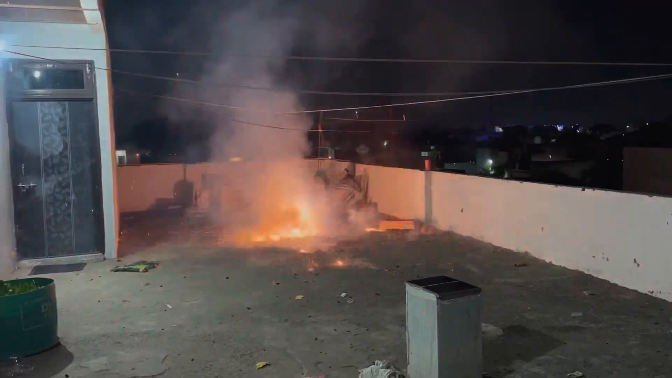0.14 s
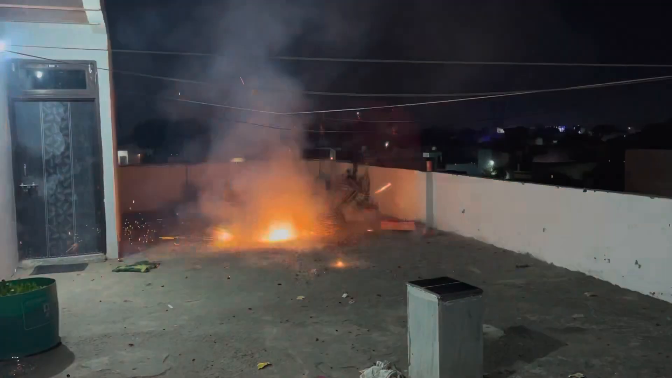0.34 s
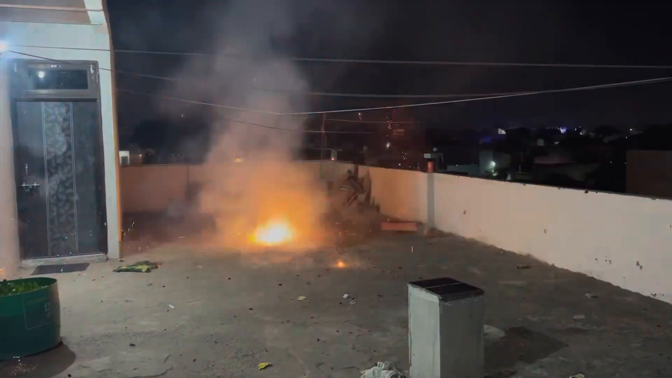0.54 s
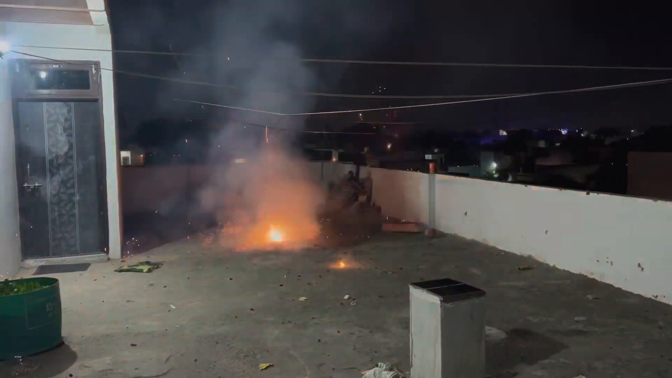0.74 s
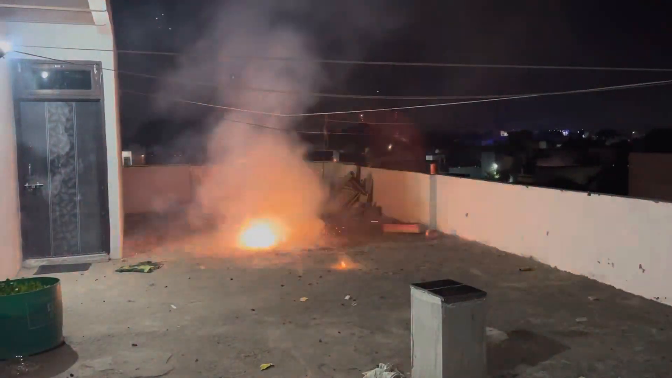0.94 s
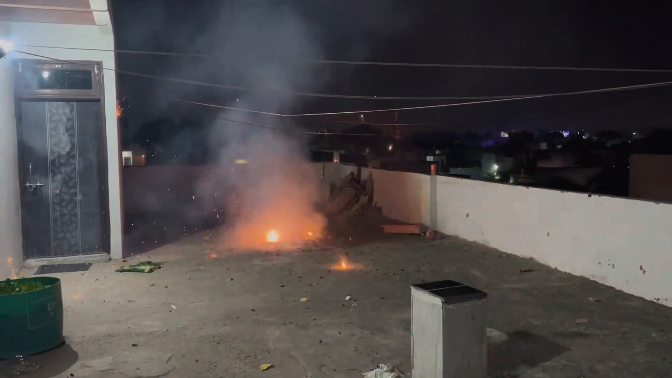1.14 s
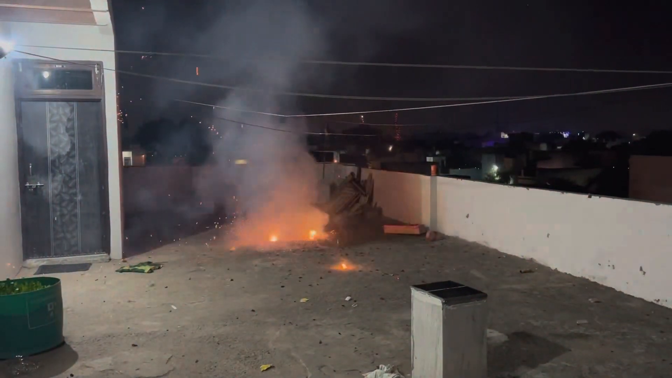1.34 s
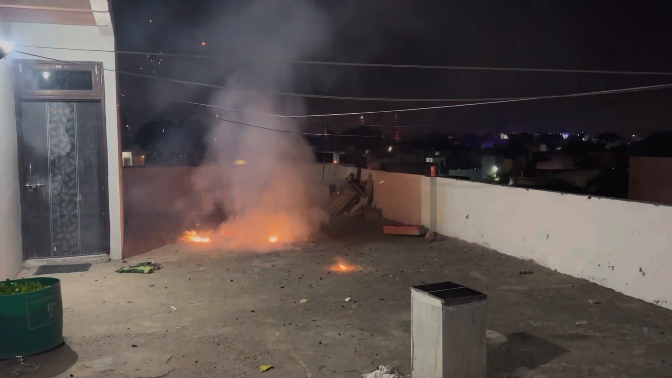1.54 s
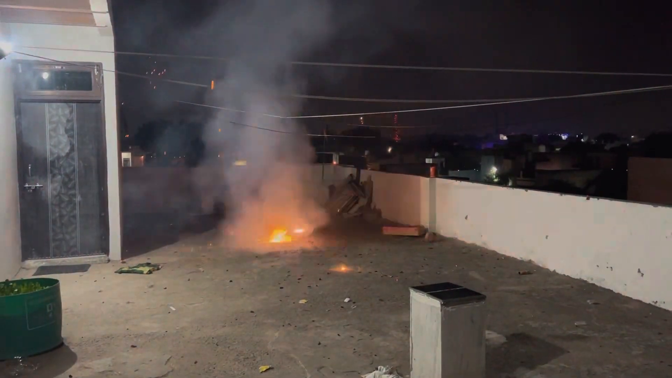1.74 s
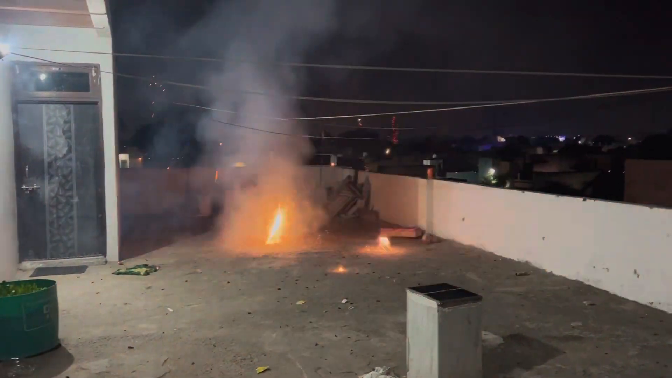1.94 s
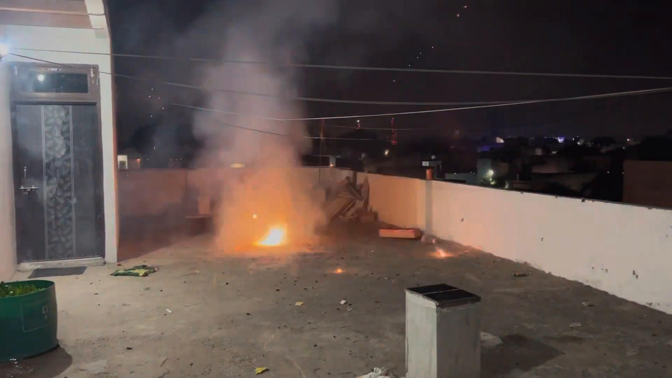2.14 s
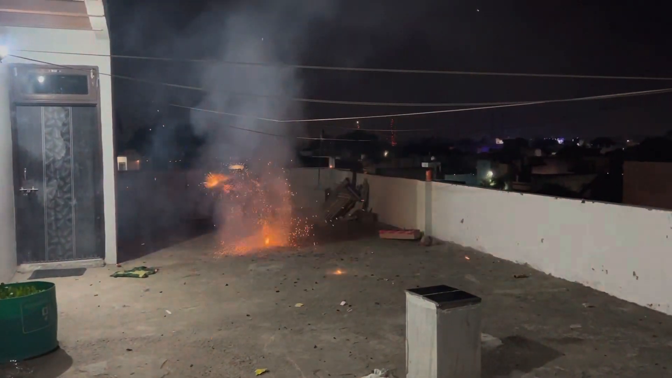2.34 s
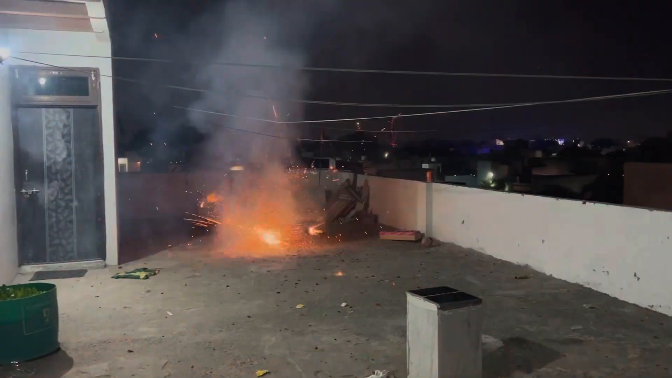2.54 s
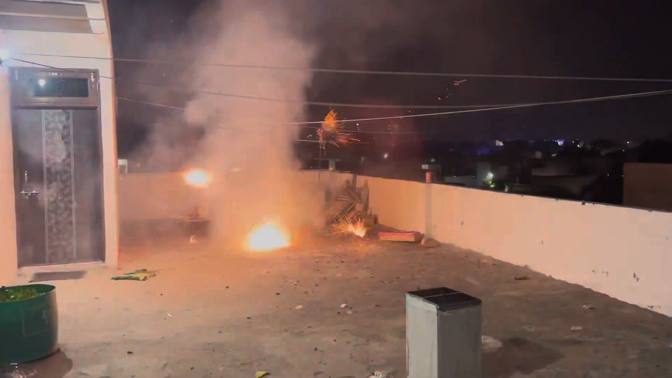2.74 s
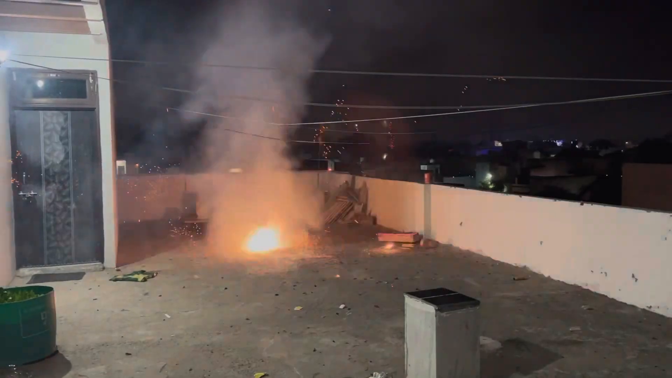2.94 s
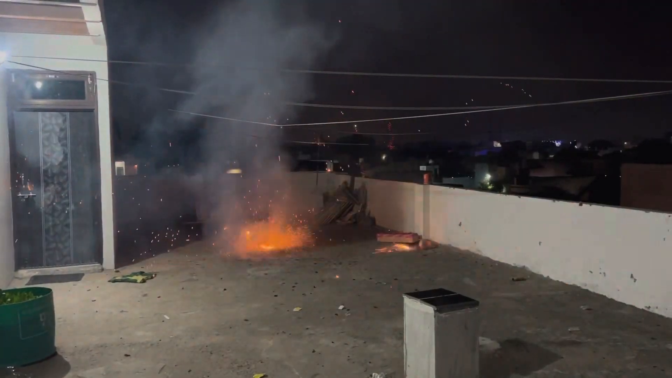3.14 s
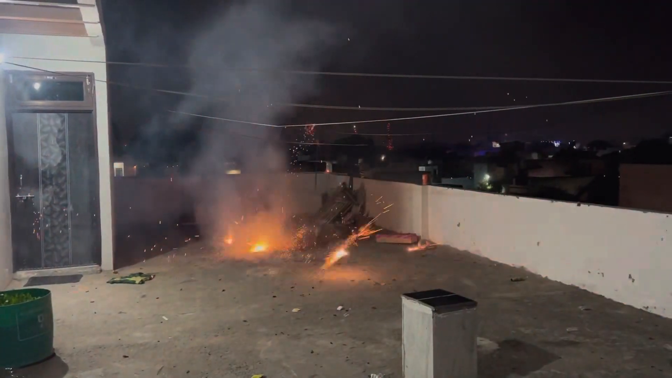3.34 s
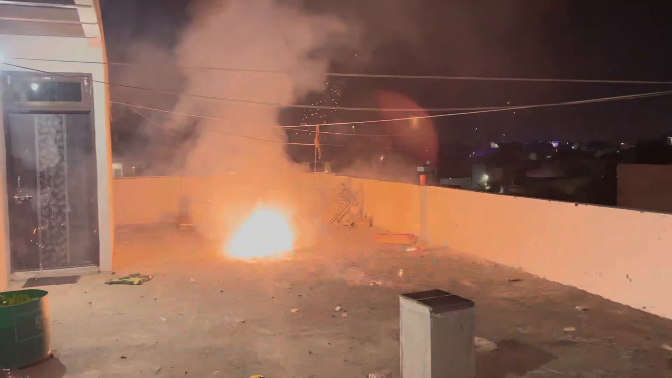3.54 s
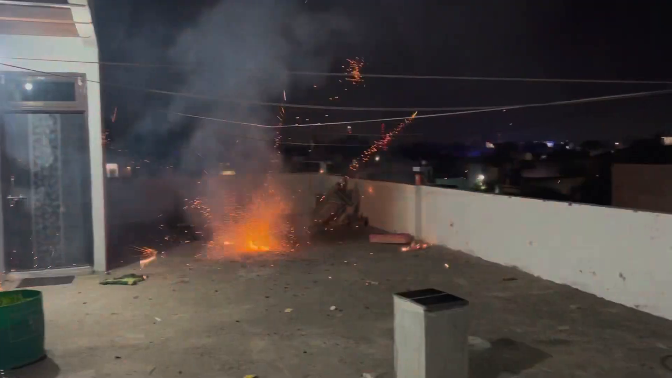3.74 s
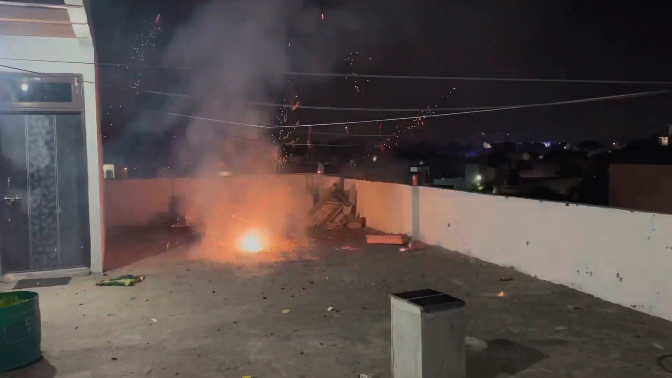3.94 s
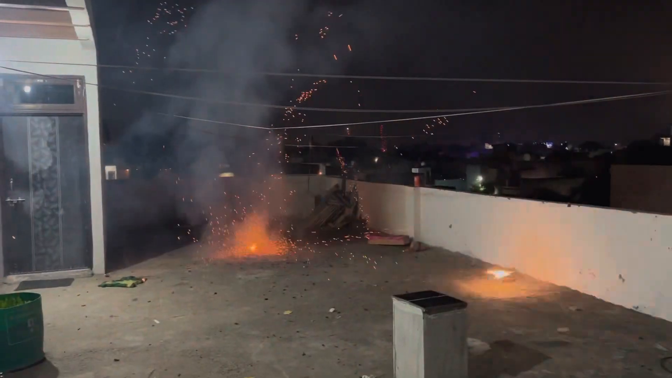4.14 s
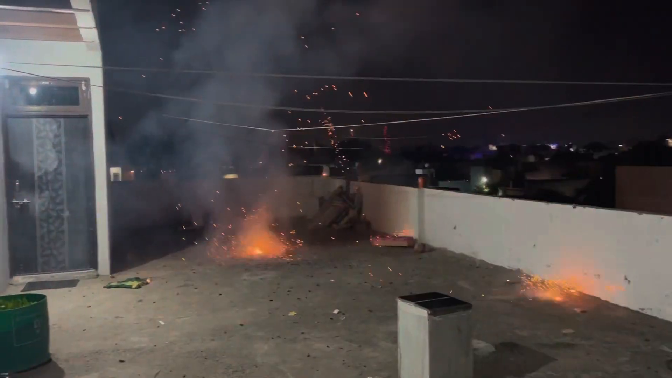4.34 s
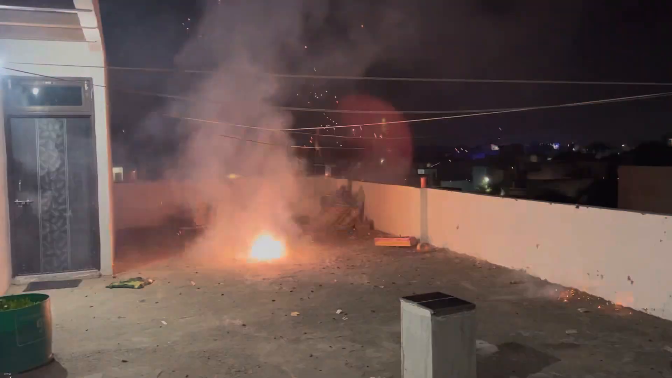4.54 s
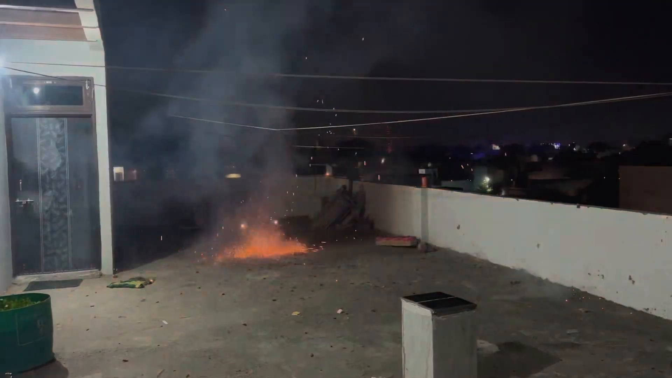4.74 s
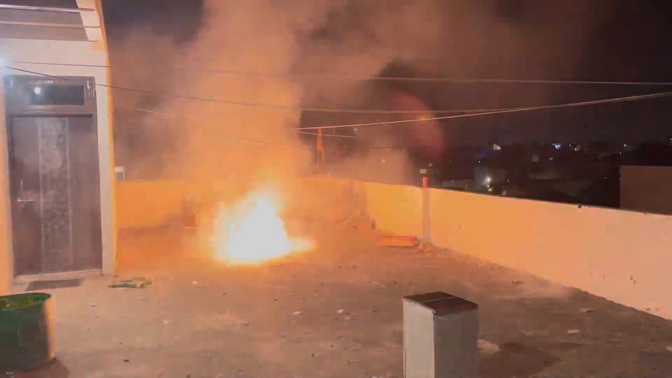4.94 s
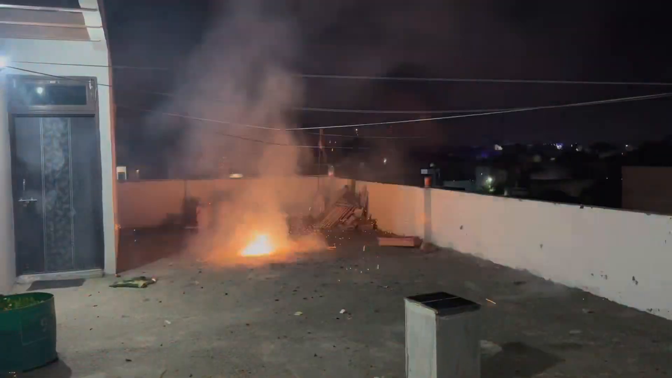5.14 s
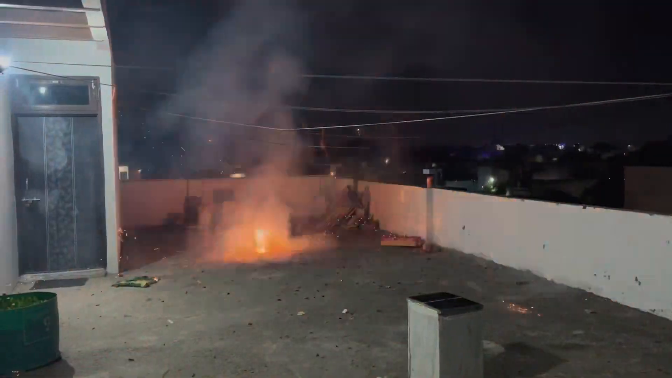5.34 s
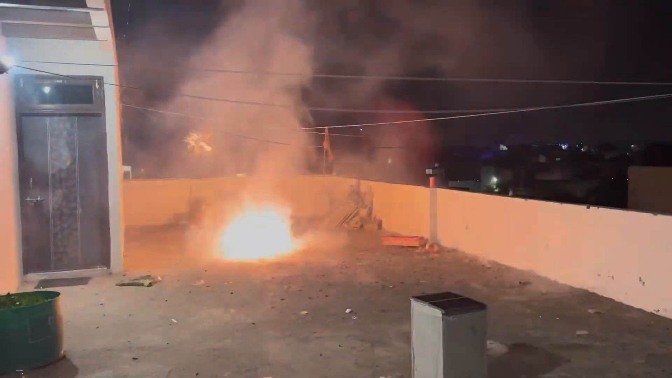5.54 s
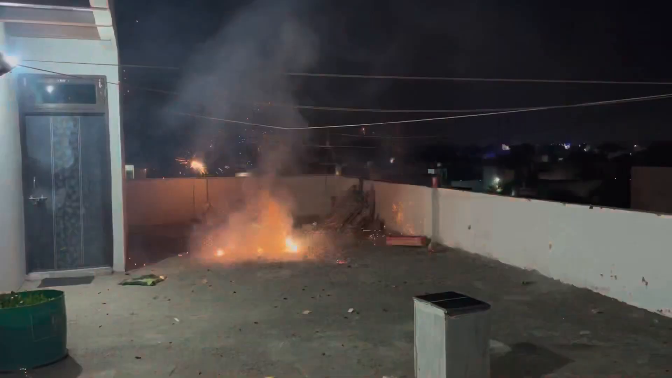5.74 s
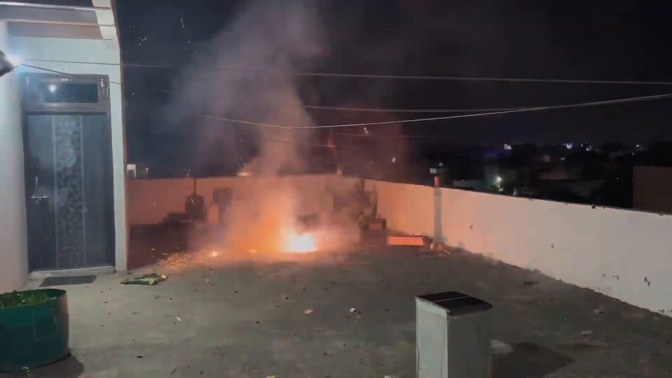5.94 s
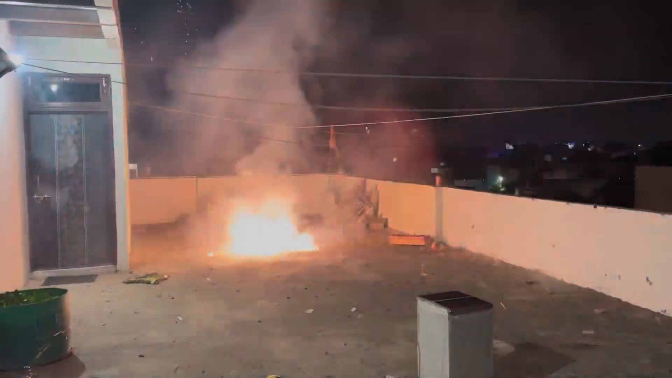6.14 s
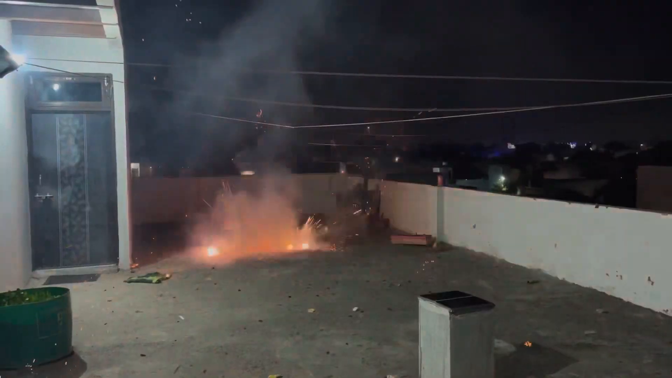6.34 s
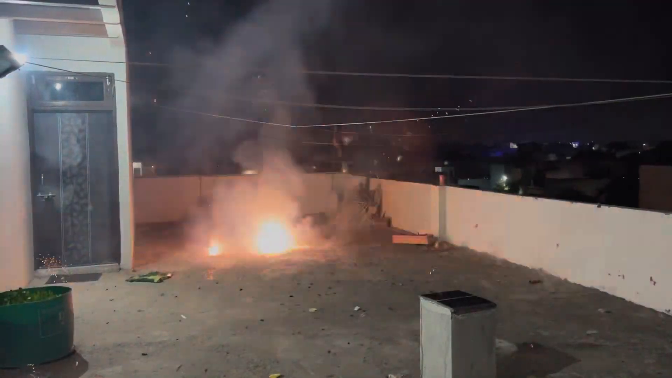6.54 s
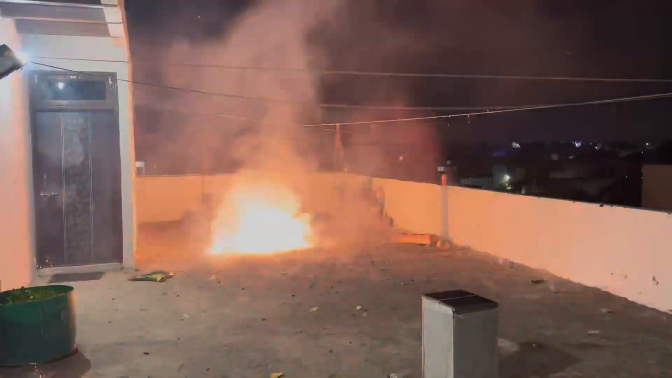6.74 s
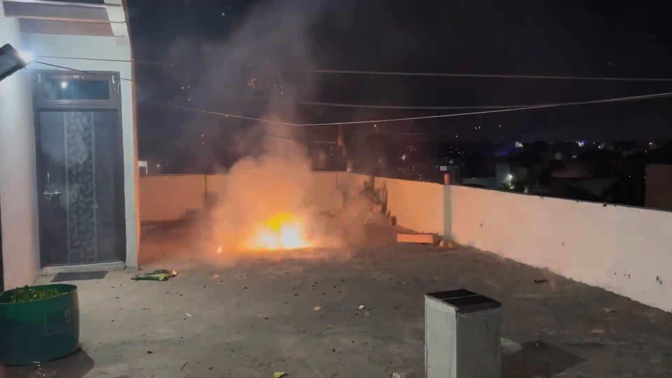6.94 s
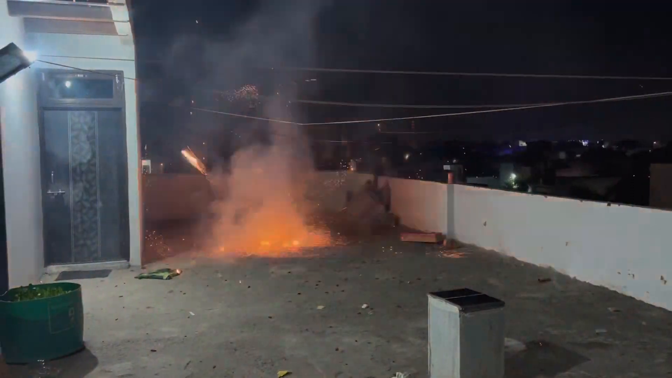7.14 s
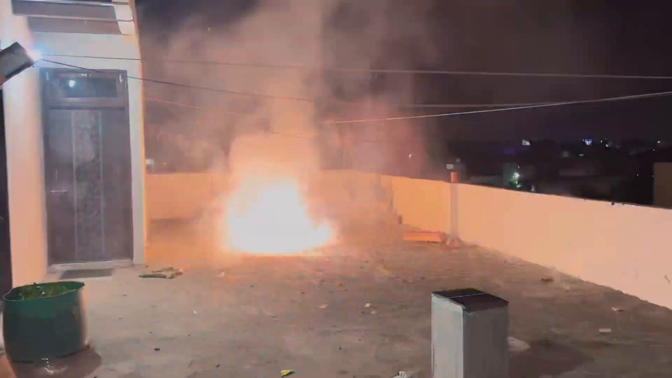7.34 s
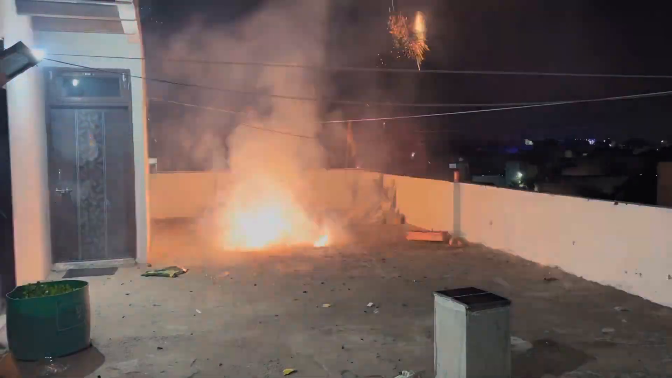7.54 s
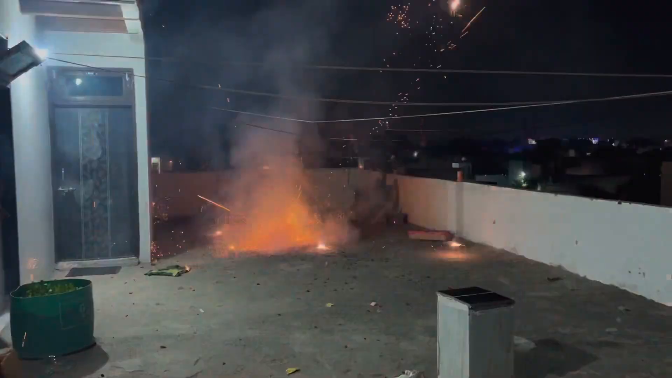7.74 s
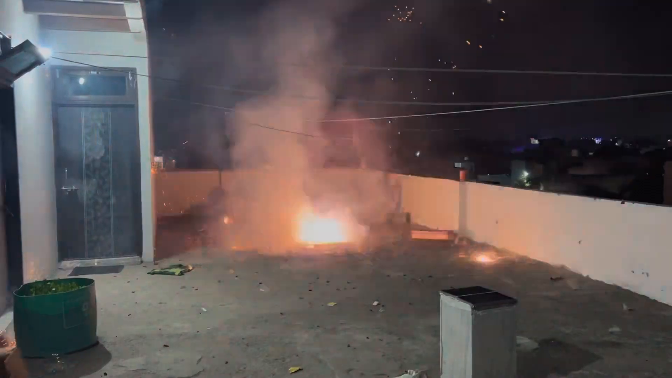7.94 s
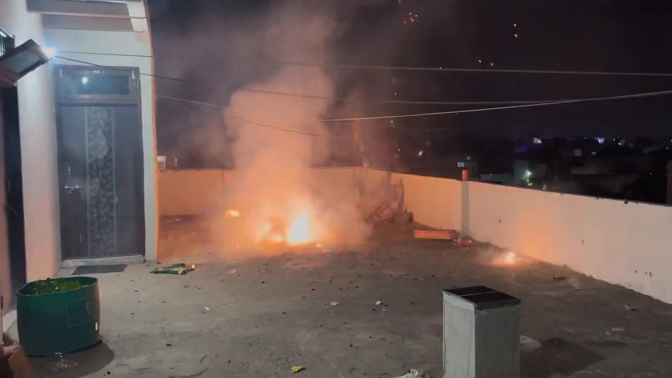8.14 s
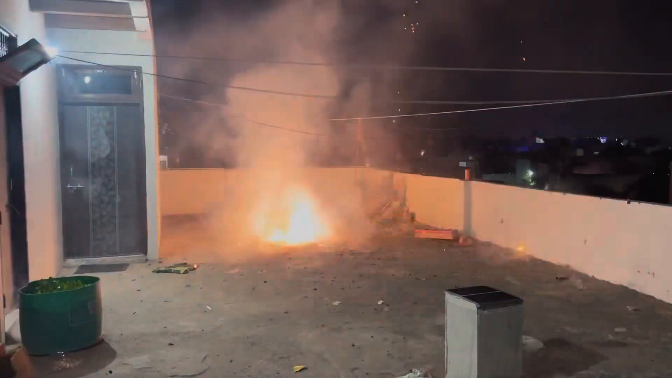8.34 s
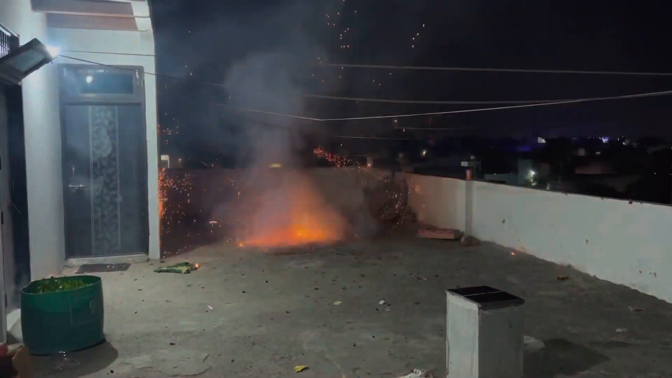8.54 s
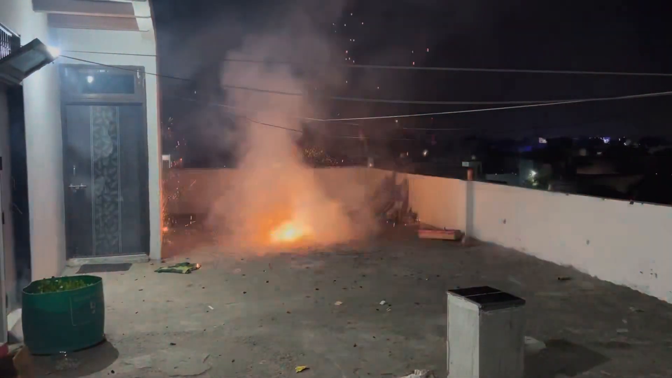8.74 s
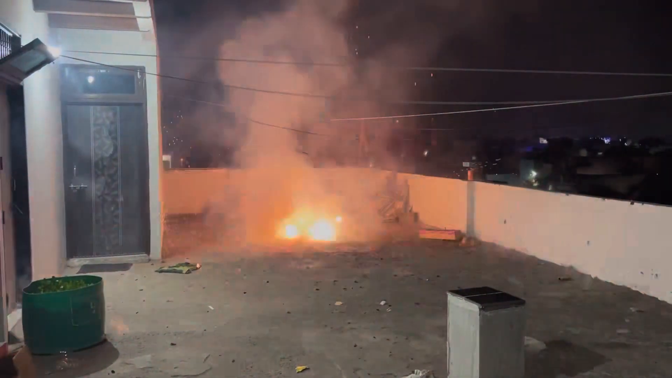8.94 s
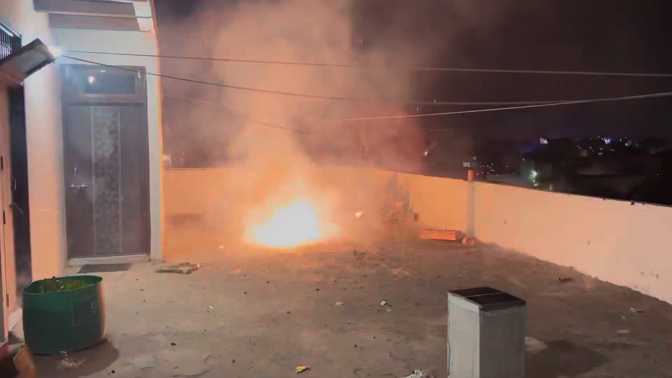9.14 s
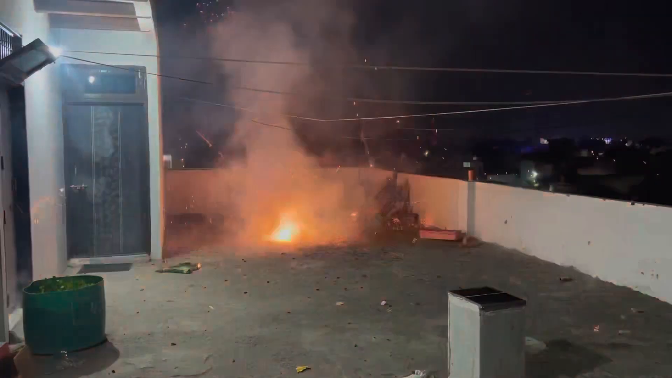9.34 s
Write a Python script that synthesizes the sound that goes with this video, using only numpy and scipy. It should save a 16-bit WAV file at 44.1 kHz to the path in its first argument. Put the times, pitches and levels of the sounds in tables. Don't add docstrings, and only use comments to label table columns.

```python
import sys
import numpy as np
from scipy import signal
from scipy.fft import rfft, irfft, next_fast_len
from scipy.io import wavfile
from scipy.ndimage import uniform_filter1d

SR = 44100
rng = np.random.default_rng(int(sys.argv[2]) if len(sys.argv) > 2 else 0)


def generate_wav(sig):
    pcm = np.round(np.clip(np.atleast_2d(sig).T, -1, 1) * 32767).astype(np.int16)
    wavfile.write(sys.argv[1], SR, pcm)


def voltage_ratio(level):
    return 10 ** (np.asarray(level, float) / 20)


N = 418068

# (frequency [Hz], level [dB per Hz])
NIGHT_SPECTRUM = [(15, -45), (40, -18), (100, 10.5), (311, 9.5), (919, -3), (4000, -11.5), (8000, -13.5),
                  (14000, -20.5), (16300, -50)]
# (time [s], frequency [Hz], level [dB])
WHISTLES = [
    [(0, 3100, -56), (.1, 3150, -58), (.19, 3130, -53), (.3, 3050, -55), (.42, 2980, -54), (.5, 2960, -58),
     (.6, 2930, -58), (.68, 2900, -62)],
    [(5.38, 1320, -50), (5.42, 1345, -31), (5.5, 1385, -30), (5.54, 1400, -48)],
    [(5.6, 1560, -55), (5.62, 1440, -35), (5.645, 1370, -37), (5.67, 1320, -56)],
    [(8.26, 960, -64), (8.29, 1090, -52), (8.33, 1220, -39), (8.39, 1250, -31), (8.42, 1240, -48)],
]
# (frequency [Hz], level [dB per Hz])
POWDER_SPECTRUM = [(15, -49), (30, -28), (50, -2), (110, -2.5), (190, -3.5), (260, -7.5), (500, -10.5),
                   (750, -14.5), (1400, -12), (2500, -15), (5000, -20.5), (8000, -24), (13000, -24.5),
                   (15500, -32.5), (16300, -46)]
# (delay [s], level [dB], sideways spread [samples])
WALL_COPIES = [(0, 7.5, -5.5), (.0022, 1.5, -7), (.0061, 1.5, -10.5), (.0107, -3, 0), (0.0138, -21.5, 4),
               (0.017, -20, 6), (.022, -9.5, 4), (.029, -11.5, 2)]
# (frequency [Hz], time to fall 60 dB [s])
YARD_DECAY = [(40, 0.11), (110, 0.015), (300, 0.37), (750, 0.37), (2000, 0.23), (5000, 0.26), (13500, 0.2)]
# (frequency [Hz], time to fall 60 dB [s])
TOWN_DECAY = [(50, 3.1), (500, 0.73), (4000, 1.27), (14000, 0.29)]
# (frequency [Hz], width [Hz], level [dB])
PARAPET_RINGS = [(182, 70, 2.5), (386, 26, 5)]
# (frequency [Hz], left-right likeness [0 to 1])
PORT_LIKENESS = [(60, 0.95), (300, 0.97), (700, 0.52), (1100, 0.13), (2100, 0.76), (2800, 0.38),
                 (4500, 0.97), (5300, 0.18), (6500, 0.7), (8000, 0.4)]
# (frequency [Hz], left leads by [rad])
PORT_LEAD = [(0, 0), (700, .5), (1050, 1.1), (1300, 2.6), (1650, 3.9), (1850, 6.4), (2400, 7.1),
             (4800, 7.1), (6300, 12.4), (7100, 12.5), (16000, 3.1)]
# (frequency [Hz], left over right [dB])
PORT_TILT = [(60, 0.0), (110, 0.0), (200, 0.0), (380, 1.0), (700, 2.0), (1290, -0.5), (2380, 1.0),
             (4400, 0.5), (8120, 0.0), (15000, 0.0)]

# (time [s], peak level [dB], boom [dB], sharpness [dB])
OPEN_EARLY = [(-.12, -4, -11, -14), (.087, -20, -36, -9), (.1957, -1.5, -12.5, -12.5),
              (.316, -1, -19, -17.5), (.57, -19, -20, -25), (.6113, -3.5, -28, -9), (.895, -14.5, -34, -19),
              (.941, 0, -12.5, -16.5), (1.9526, -9.5, -21, -25.5), (2.072, 0.5, -30, -19.5),
              (2.389, 2, -16, -16.5), (2.536, -13, -24, -21.5), (2.703, -14.5, -33, -13.5),
              (2.742, -4.5, -12, -5.5), (2.756, 3, -32, -20), (3.0996, -2, -15.5, -15.5),
              (3.239, 0.5, -14.5, -14), (3.38, -9, -18, -17.5), (3.661, -5.5, -15.5, -8.5),
              (3.9065, 2.5, -21, -18), (4.0283, 1, -18, -17), (4.053, -1, -8.5, -12.5),
              (4.273, -27, -26, -11), (4.4405, 0.5, -14.5, -14), (4.495, -0.5, -26, -20)]
# (time [s], peak level [dB], boom [dB], sharpness [dB])
OPEN_MIDDLE = [(4.8447, -1, -57, -11.5), (5.049, -4, -39, -14.5), (5.197, -6, -28, -20),
               (5.248, -1.5, -13.5, -19), (5.301, -1, -14, -12.5), (5.442, -8.5, -20, -6.5),
               (5.4847, -1, -11, -10.5), (5.7204, -6.5, -21, -11.5), (5.794, -12.5, -25, -8),
               (5.835, -2.5, -9.5, -15.5), (5.893, -1, -15, -15), (6.0655, 0.5, -16, -13.5),
               (6.156, -15.5, -22, -22), (6.1986, -1, -15, -26), (6.3098, -2, -20, -21.5),
               (6.405, -0.5, -19.5, -16), (6.429, -9.5, -28, -14), (6.536, -6.5, -23, -12.5),
               (6.614, -17, -12, -25), (6.67, -1.5, -31, -16), (6.715, -24, -8, 2.5)]
# (time [s], peak level [dB], boom [dB], sharpness [dB])
OPEN_LATE = [(7.188, -2, -7, -13), (7.229, -4.5, -41, -12), (7.353, -17, -23, -13.5),
             (7.423, -3.5, -24, -28.5), (7.733, -2, -16, -14.5), (7.8336, -1.5, -15.5, -13.5),
             (8.396, -9.5, -7, -9), (8.436, -1, -7, -15.5), (8.591, -14, -7, -20),
             (8.6115, -1.5, -12, -13.5), (8.658, -2, -21, -15.5), (8.7035, -2.5, -13, -10.5),
             (8.815, -3, -27, -32.5), (8.9, -17, -31, -22.5), (9.015, 0.5, -24, -15),
             (9.16, 1.5, -10.5, -17.5), (9.254, -1, -12, -18), (9.295, -1, -29, -13)]
# (time [s], peak level [dB], boom [dB], sharpness [dB])
FLUNG = [(.345, -6, -14, -14), (.676, -8.5, -18, -15), (.708, -6.5, -41, -17.5), (.91, -6, -28, -20),
         (1.189, -46, 9, -21), (1.2115, -8, -18, -23.5), (1.731, -10.5, -22, -13), (1.856, -7, -20, -16),
         (2.1875, -6.5, -23, -16.5), (2.65, -32, -22, -23), (2.852, -6, -24, -19),
         (2.9735, -7.5, -16.5, -8), (3.5666, -1, -13.5, -11), (4.227, -9.5, -16, -7),
         (4.597, -4.5, -14, -10.5), (4.626, -7.5, -36, -17.5), (4.976, -12, -7, -8.5),
         (5.025, 1.5, -13, -15.5), (5.159, -0.5, -28, -18.5), (5.532, -5, -18, -12),
         (5.945, -2.5, -13, -12), (6.648, -37, -3, -15), (7.017, 3.5, -38, -24.5), (7.949, -9.5, -26, -9.5),
         (8.304, -10, -16, -21), (8.777, -10, -23, -4), (8.9455, -2.5, -31, -14.5), (9.202, -3.5, -20, -26),
         (9.323, -12, -25, -8.5), (9.405, -6.5, -15, -10.5)]
# (time [s], peak level [dB], boom [dB], sharpness [dB])
HIDDEN = [(.818, -22, -19, -10), (1.358, -37.5, 2, -26), (1.781, -18.5, -14, -17), (2.215, -5.5, -11, -19),
          (3.781, -7, -21, -9.5), (4.837, -8.5, -7, -33), (5.412, -16, -28, -22), (5.466, -17.5, 0, -8.5),
          (6.901, -8.5, -3, -11.5), (6.913, -6, -15.5, -14.5), (7.0, -7, -11, -24), (7.047, -16, -35, -7.5),
          (7.082, -4.5, -17, -18.5), (7.393, -10, -24, -19), (7.563, -15, -14, -18.5),
          (7.588, -8, -18.5, -21), (8.006, -7.5, -10, -34), (8.035, -5.5, -31, -16), (8.358, -12, -11, -25),
          (8.511, -8.5, -27, -16), (9.279, -19, -22, -7)]
# (time [s], peak level [dB], boom [dB], sharpness [dB])
UNSEEN = [
    (1.4, -53, -20, -12),
    (1.42, -50, -12, 5),
    (2.416, -17, -33, -22.5),
    (7.695, -19, -2, -25.5),
]
# (time [s], peak level [dB], boom [dB], sharpness [dB], yard
# feed [dB])
BURIED = [(.227, -11, -25, -11, -14), (.243, -16, -15, -3, -3), (1.41, -44.5, -19, -8, 21.5),
          (1.433, -40.5, -20, -11, 13), (1.448, -41, -10, -17, 13), (1.56, -58, -18, -0.5, 17.5),
          (1.53, -54, 10, -20, 0), (.849, -26, -25, -6, -13), (2.222, -14, -21, -1, -14),
          (3.76, -24, -22, -6, -8), (5.747, -14, -27, -12, -6), (6.005, -25, -25, -10, -8),
          (7.053, -15.5, -25, -13, 0), (7.405, -19, -23, -12, 0), (7.648, -26, -27, -16, -5),
          (8.365, -12, -23, -11.5, -2), (9.423, -20, -25, -12, -5), (1.792, -14, -16, -16, -8),
          (2.314, -33, -25, -6, -6), (2.488, -25.5, -25, -9, 3), (3.599, -12.5, -29, -15.5, 10.5),
          (3.798, -2.5, -22, -18, -8), (3.819, -7, -30, -18, -20), (4.217, -19, -28, -2.5, -5),
          (4.518, -14.5, -31, -20, 4.5), (5.083, -20, -25, -8, -1), (5.359, -26, -25, -14, -8),
          (5.862, -7.5, -26, -9, -13), (6.952, -8, -11, -12.5, 4.5), (6.979, -10.5, -8, -10.5, 7.5),
          (7.199, -3.5, -25, -11.5, 4), (7.855, -10, -25, -12, 0), (8.129, -12, -10, -19, 1),
          (8.462, -8, -25, -13, -2), (8.635, -7, -25, -14, -8), (9.064, -12, -25, -19, 4),
          (9.174, -6, -12, -7.5, -1.5)]
OPEN_YARD_DB, FLUNG_YARD_DB, HIDDEN_YARD_DB, UNSEEN_YARD_DB = 1.1, -2, 7.5, 17.5


def along(points, hz):
    f, value = np.transpose(points)
    return np.interp(np.log(hz + 1), np.log(f + 1), value)


def filtered(x, response):
    m = next_fast_len(N + SR)
    return irfft(rfft(x, m) * response(np.fft.rfftfreq(m, 1 / SR)), m)[..., :N]


def peak(f, hz, width_hz):
    return 1j * f * width_hz / (hz * hz - f * f + 1j * f * width_hz)


def bass_cut(f, hz):
    return (1j * f / hz) ** 2 / (1 + 1.4j * f / hz - (f / hz) ** 2)


def spread(pair):
    def mid_side(hz):
        turn = np.arccos(np.clip(along(PORT_LIKENESS, hz), -1, 1)) / 2
        return np.array([np.cos(turn), np.sin(turn)])
    mid, side = filtered(pair, mid_side)
    return np.array([mid + side, mid - side])


def night():
    air = filtered(rng.standard_normal((2, N)), lambda hz: voltage_ratio(along(NIGHT_SPECTRUM, hz)))
    return voltage_ratio(-49.0) * spread(air / air.std())


def whistles():
    t = np.arange(N) / SR
    breath, waver = filtered(rng.standard_normal((2, N)), lambda f: np.exp(-(f / 45) ** 2))
    breath = 1 + .3 * breath / breath.std()
    waver = 1 + .012 * waver / waver.std()
    out = np.zeros(N)
    for rows in WHISTLES:
        s, hz, db = np.transpose(rows)
        turns = np.cumsum(np.interp(t, s, hz) * waver) / SR
        level = voltage_ratio(np.interp(t, s, db, left=-120, right=-120) + 7.5)
        out += level * np.sin(2 * np.pi * turns)
    return breath * out


def tails(count, town_db, grain_db, rise_s):
    hz, t, z = signal.stft(rng.standard_normal((count, 2, SR)), SR, nperseg=256)
    yard_fade = voltage_ratio(-60 * t / along(YARD_DECAY, hz)[:, None])
    town_fade = voltage_ratio(town_db - 60 * t / along(TOWN_DECAY, hz)[:, None])
    tail = signal.istft(z * (yard_fade + town_fade), SR, nperseg=256)[1][..., :SR]
    t = np.arange(SR) / SR
    lumps = np.repeat(rng.standard_normal((count, 1, SR // 30)), 30, axis=-1)
    tail = tail * voltage_ratio(grain_db * lumps * np.exp(-t / 0.14))
    tail = tail * (1 - np.exp(-t / rise_s))
    return tail / np.sqrt(np.mean(np.sum(tail ** 2, -1), -1))[:, None, None]


def yard(feed):
    m = next_fast_len(N + 2 * SR)
    answers = tails(count=len(feed), town_db=-24.0, grain_db=4.5, rise_s=0.002)
    far = irfft((rfft(feed, m) * rfft(answers, m)).sum(0), m)[:, SR:SR + N]

    def ring_and_sky(f):
        ring = np.prod([1 + (voltage_ratio(db) - 1) * peak(f, hz, width) for hz, width, db in PARAPET_RINGS], 0)
        return ring * bass_cut(f, 130)
    return voltage_ratio(8.5) * spread(filtered(far, ring_and_sky))


def terrace_hum(feed):
    hz, width_hz, level_db = 384.7, 11, -2
    wave = lambda f: peak(f, hz, width_hz) * peak(f, hz, 3 * width_hz)
    return voltage_ratio(level_db + 20) * filtered(feed.sum(0)[:, SR:SR + N], wave)


def with_roll(near):
    delay_s, hz, width_hz, level_db = .075, 46, 13, -5

    def block(f):
        return 1 + voltage_ratio(level_db) * np.exp(-2j * np.pi * f * delay_s) * peak(f, hz, width_hz) ** 2
    return filtered(near[:, SR:SR + N], block)


def string():
    snap_db, snap_grows = -8.5, 0.84
    places = [(list(OPEN_EARLY) + list(OPEN_MIDDLE) + list(OPEN_LATE), OPEN_YARD_DB),
              (FLUNG, FLUNG_YARD_DB), (HIDDEN, HIDDEN_YARD_DB), (UNSEEN, UNSEEN_YARD_DB)]
    rows = sorted((*row, yard_db) for table, yard_db in places for row in table)
    rows = rows + list(BURIED)
    return [(s, db, boom_db, sharp_db, snap_db - 14 + snap_grows * (sharp_db + 13.0), yard_db)
            for s, db, boom_db, sharp_db, yard_db in rows]


def blast_colour(hz, high, levels, comb, turn):
    db, boom_db, crack_db, snap_db = levels
    low = 1 / (1 + (hz / 150) ** 4)
    middle = 1 / (1 + (1700 / (hz + 1)) ** 4) - high
    level = along(POWDER_SPECTRUM, hz) + db + 29.5
    level = level + (boom_db + 15.0) * low + (crack_db + 11.5) * middle + (snap_db + 14.5) * high
    bounce_s = 0.0005 * (1 + 0.313 * comb[3])
    bounce_db = 3.07 * (1 - low) * np.sin(2 * np.pi * hz * bounce_s + 3 * turn[3])
    return voltage_ratio(level + bounce_db)


def wall_answer(hz, high, size, yard_db, luck):
    shift, strength, side, comb, turn = luck
    delay, wall_db, sideways = np.transpose(WALL_COPIES)[..., None]
    at = size / 8 / SR + 0.0011 + delay * (1 + 0.0441 * shift)
    split = np.exp(-2j * np.pi * hz * 0.000495 * np.abs([comb, turn]))
    rough = 1 + 0.35 * high * (split[0] - split[1])
    rough = rough * (1 - np.clip(delay / 0.015, 0, .9) / (1 + (hz / 270) ** 4))
    scatter_db = 2.5 * strength * (delay > 0)
    scatter_db = scatter_db + 0.47 * np.clip(yard_db, -10, 5) * (delay > .008)
    copies = np.exp(-2j * np.pi * at * hz) * rough * voltage_ratio(wall_db + scatter_db)
    wide = hz / (1 + (hz / 5500) ** 12) / (1 + (220 / (hz + 1)) ** 2)
    apart = np.exp(-1j * np.pi * sideways * side * wide / SR)
    return np.array([(copies * apart).sum(0), (copies / apart).sum(0)])


def crackers(count=6, size=4096):
    hz = np.fft.rfftfreq(size, 1 / SR)
    high = 1 / (1 + (5000 / (hz + 1)) ** 4)
    blasts = string()
    chance = rng.standard_normal((len(blasts), 5, len(WALL_COPIES), 1))
    near = np.zeros((2, N + 2 * SR))
    feed = np.zeros((count, 1, N + 2 * SR))
    for k, ((s, *levels, yard_db), luck) in enumerate(zip(blasts, chance)):
        colour = blast_colour(hz, high, levels, comb=luck[3], turn=luck[4])
        start = round(s * SR) + SR - size // 8
        walls = wall_answer(hz, high, size, yard_db, luck)
        near[:, start:start + size] += irfft(colour * walls, size)
        impulse = np.roll(irfft(colour, size), size // 8)
        feed[k % count, 0, start:start + size] += voltage_ratio(yard_db) * impulse
    return terrace_hum(feed) + with_roll(near) + yard(feed)


def scene():
    return night() + whistles() + crackers()


def ports(hz):
    half = np.array([[.5], [-.5]])
    return np.exp(1j * half * np.interp(hz, *np.transpose(PORT_LEAD))) * voltage_ratio(half * along(PORT_TILT, hz))


def chirp(hz):
    return np.exp(-2j * np.pi * 1.1 * np.log((hz + 4) / 8000) - 3j * np.arctan(hz / 90))


def smear(x, smear_db, size=512):
    z = signal.stft(x, nperseg=size)[2]
    turn = np.exp(2j * np.pi * rng.random(z.shape[1:]))
    turn = turn * (np.arange(len(z[0])) > 7)[:, None]
    return voltage_ratio(smear_db) * signal.istft(z * turn, nperseg=size)[1][:, :N]


def thinned(x, under_db, jump_db, top_hz, size=512):
    hz, t, z = signal.stft([x[0] + x[1], x[0] - x[1]], SR, nperseg=size)
    power = uniform_filter1d(np.abs(z) ** 2, size // 64, 1)
    share = uniform_filter1d(power / (power.sum(0) + 1e-20), size // 40, 2)
    share = share[:, size // 128::size // 64].repeat(size // 64, 1)
    share = np.pad(share, ((0, 0), (0, 1), (0, 0)))
    treble = (np.abs(z[:, hz > 4000]) ** 2).sum((0, 1))
    calm = treble < voltage_ratio(2 * jump_db) * np.roll(treble, 1)
    top = top_hz + 250 * rng.standard_normal(len(t) // 8 + 1).repeat(8)[:len(t)]
    faint = (share < voltage_ratio(2 * under_db) * share[::-1]) & (hz > 6000)[:, None]
    too_high = hz[:, None] > [[top], [top + SR]]
    weak = (faint | too_high) & calm
    mid, side = signal.istft(z * ~weak, SR, nperseg=size)[1][:, :N]
    return np.array([mid + side, mid - side]) / 2


def band_limit(x):
    return signal.sosfilt(signal.butter(12, 16410, fs=SR, output="sos"), x)


def record(dry):
    x = filtered(dry, lambda hz: ports(hz) * chirp(hz))
    x = x / (1 + np.abs(x / 1.05) ** 8) ** (1 / 8)
    x = thinned(x + smear(x, smear_db=-14), under_db=-3, jump_db=7, top_hz=14700)
    x = filtered(x, lambda hz: bass_cut(hz, 38))
    return band_limit(x)


dry = scene()
out = record(dry)
generate_wav(out)
```